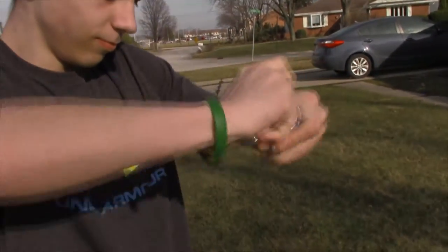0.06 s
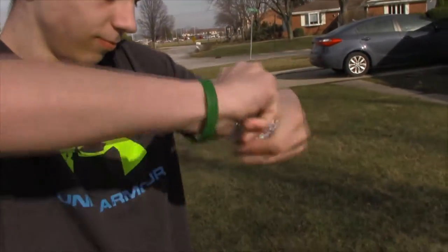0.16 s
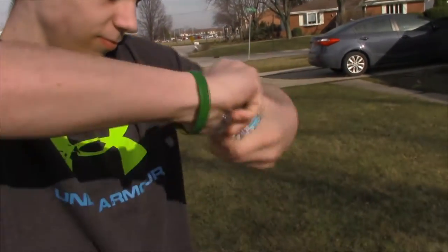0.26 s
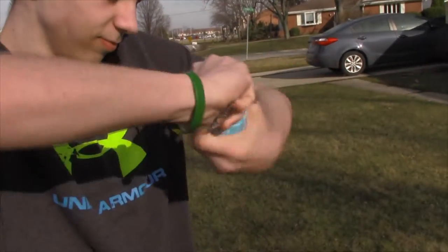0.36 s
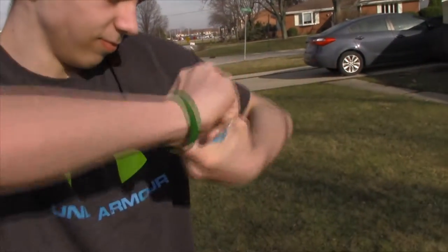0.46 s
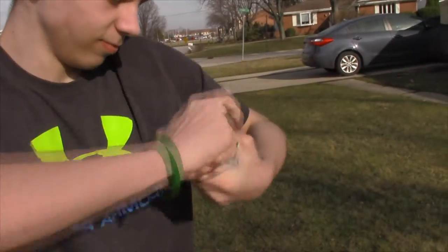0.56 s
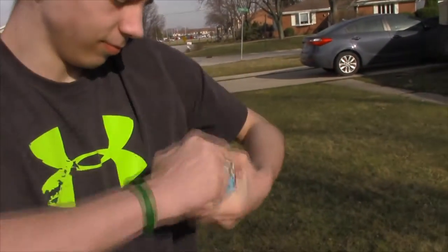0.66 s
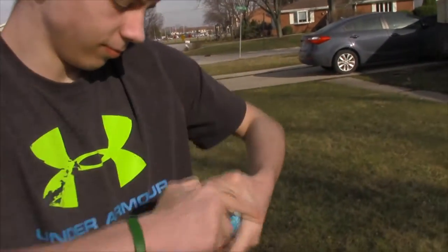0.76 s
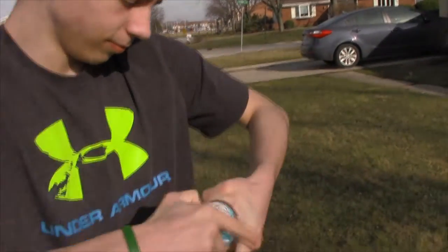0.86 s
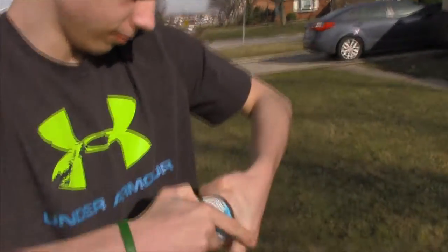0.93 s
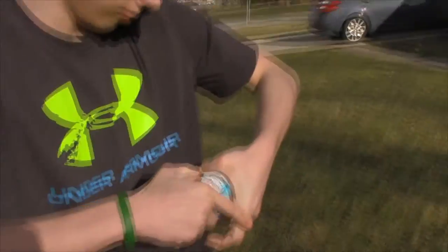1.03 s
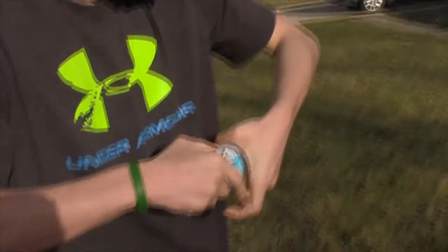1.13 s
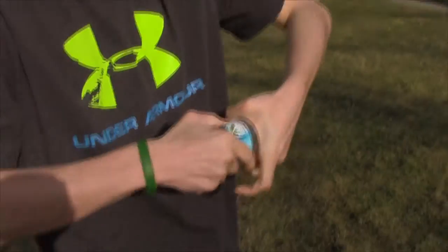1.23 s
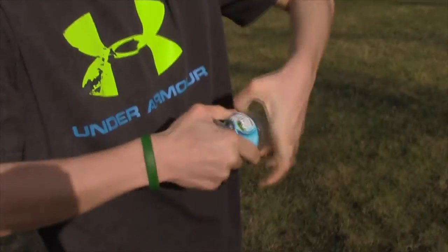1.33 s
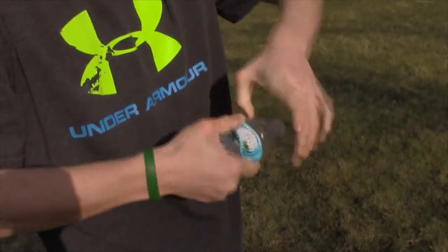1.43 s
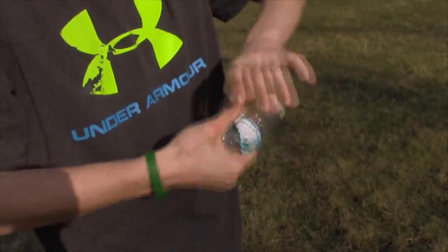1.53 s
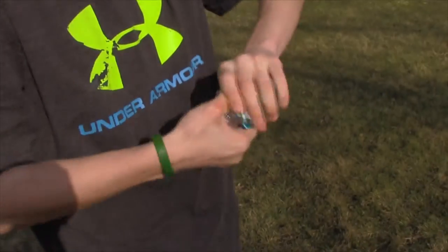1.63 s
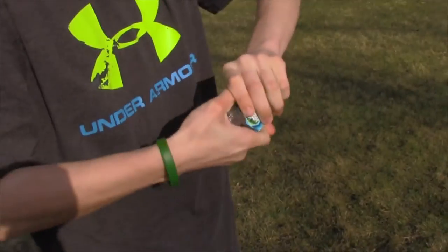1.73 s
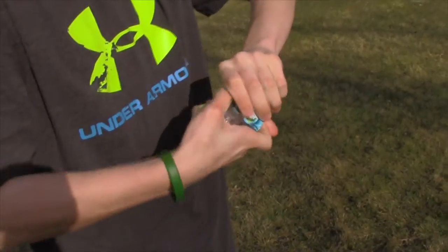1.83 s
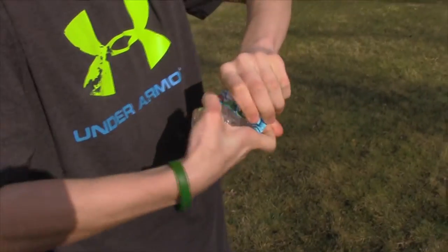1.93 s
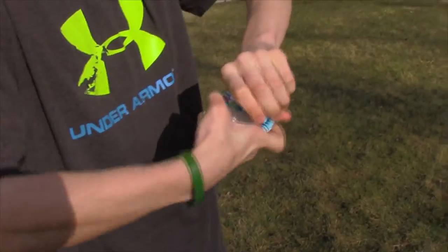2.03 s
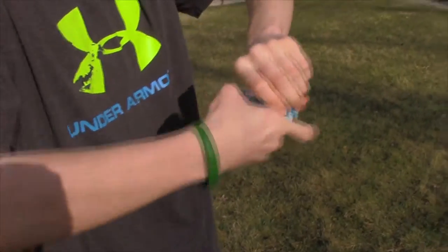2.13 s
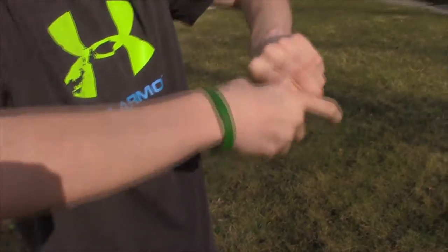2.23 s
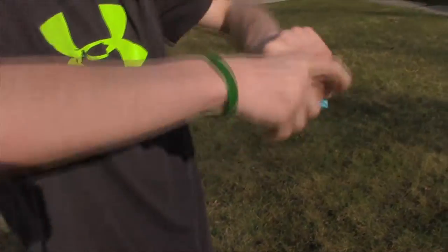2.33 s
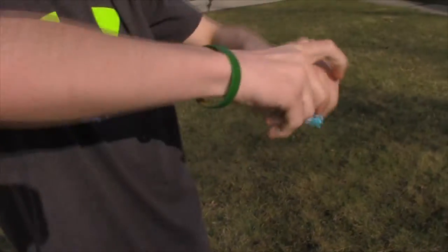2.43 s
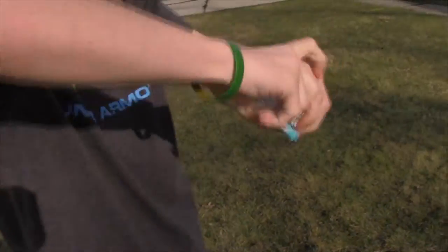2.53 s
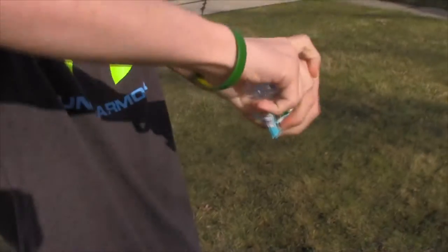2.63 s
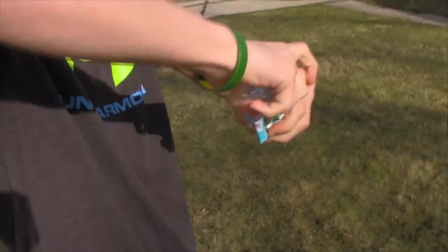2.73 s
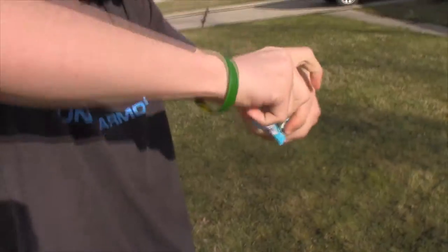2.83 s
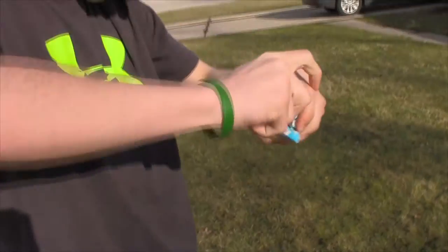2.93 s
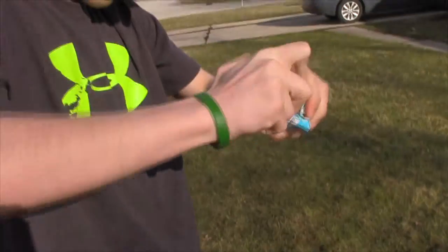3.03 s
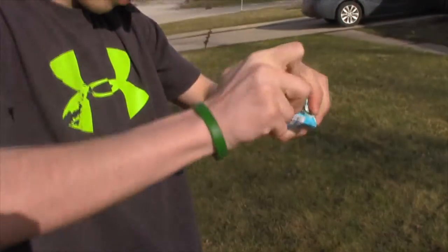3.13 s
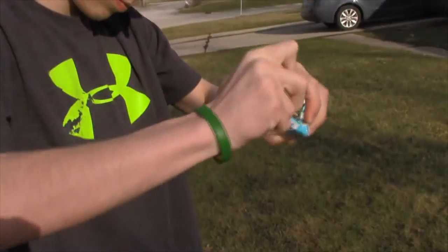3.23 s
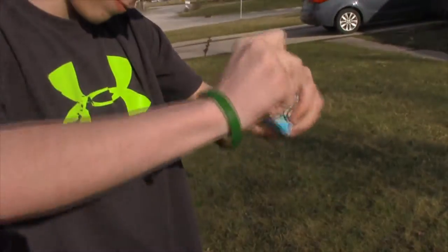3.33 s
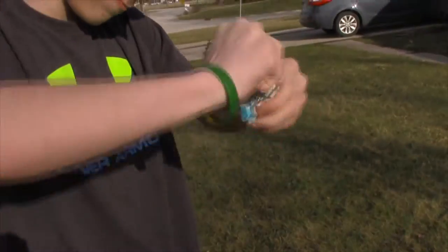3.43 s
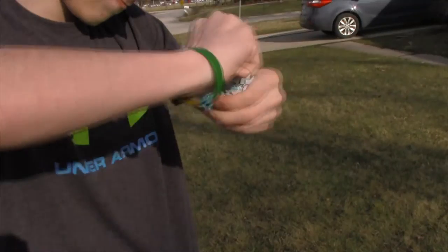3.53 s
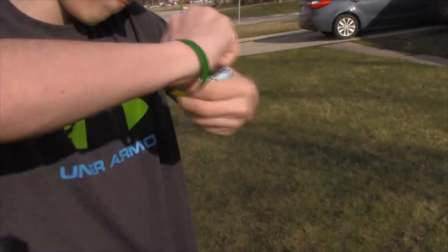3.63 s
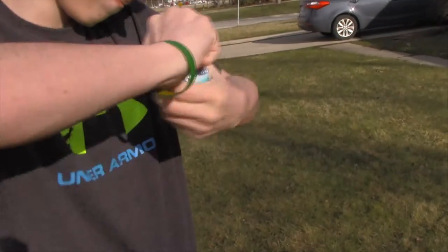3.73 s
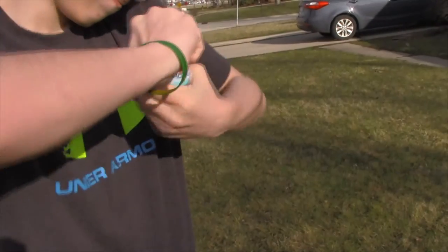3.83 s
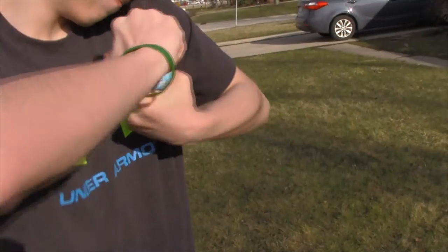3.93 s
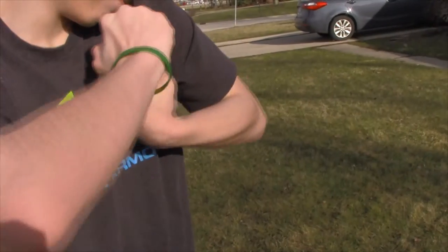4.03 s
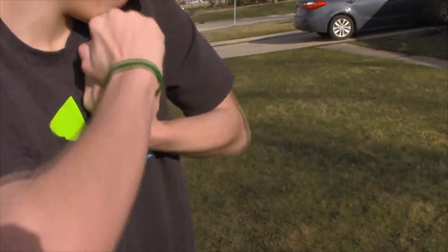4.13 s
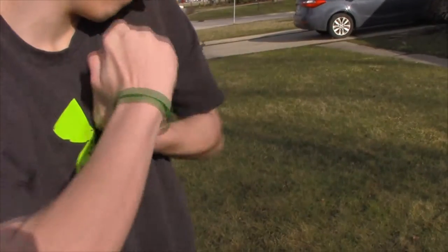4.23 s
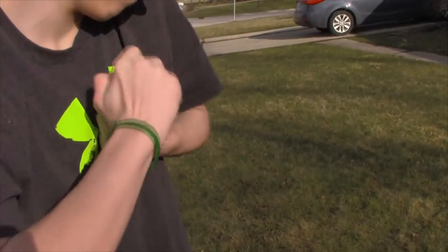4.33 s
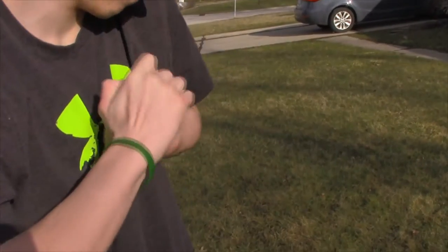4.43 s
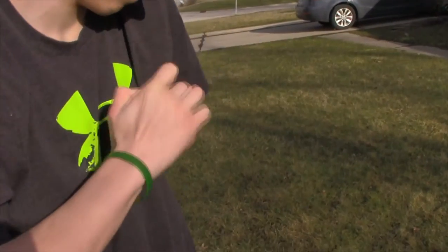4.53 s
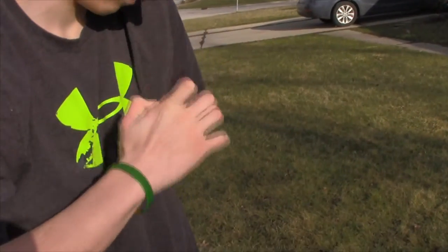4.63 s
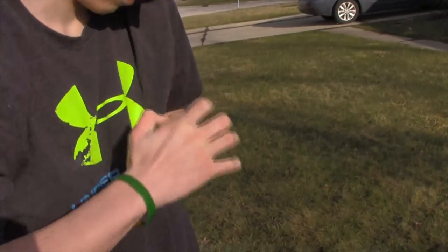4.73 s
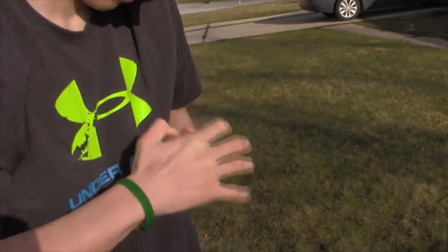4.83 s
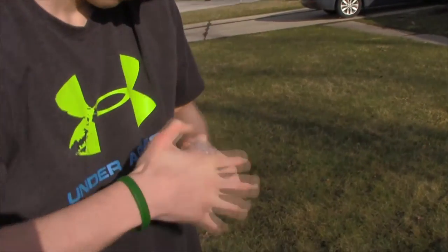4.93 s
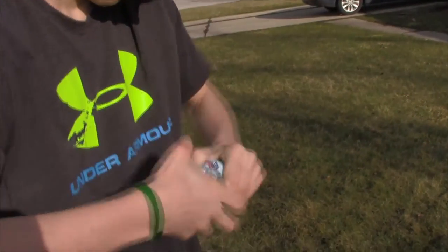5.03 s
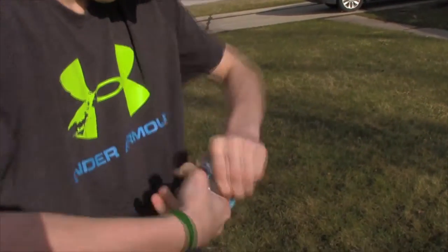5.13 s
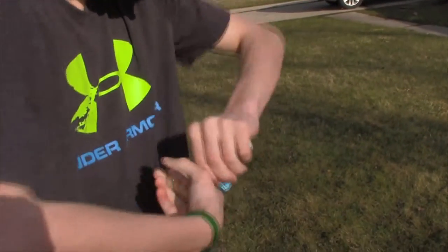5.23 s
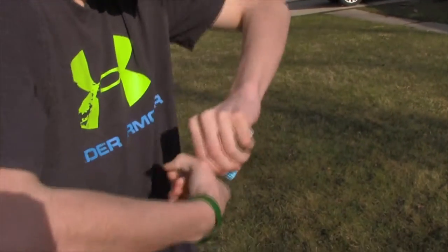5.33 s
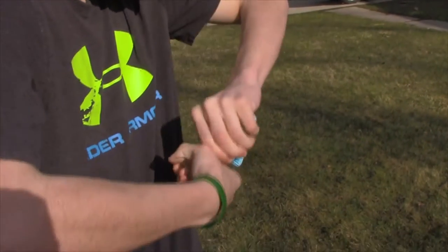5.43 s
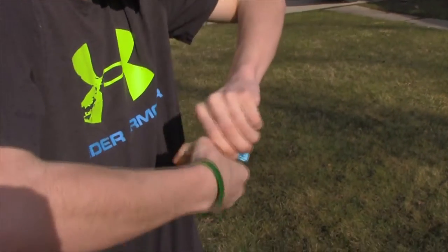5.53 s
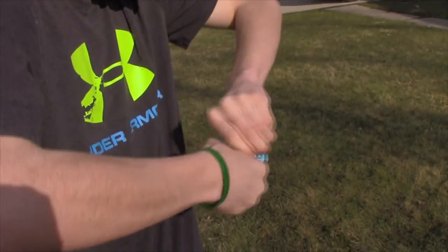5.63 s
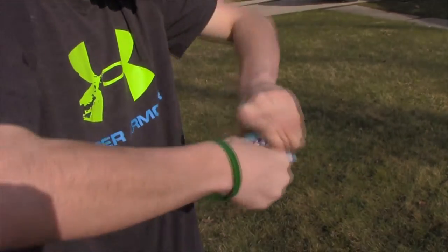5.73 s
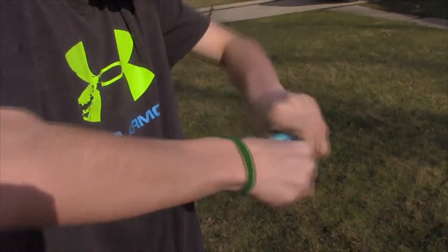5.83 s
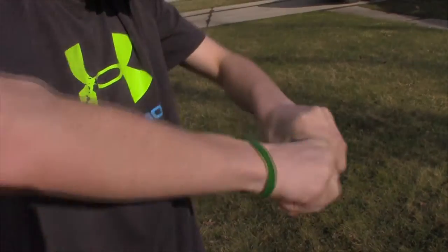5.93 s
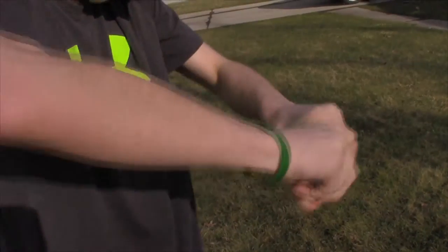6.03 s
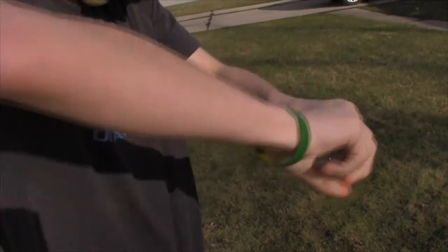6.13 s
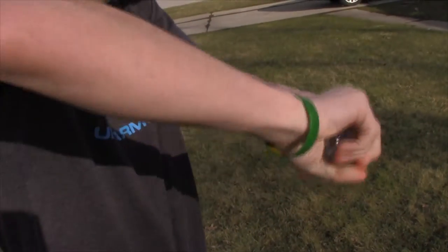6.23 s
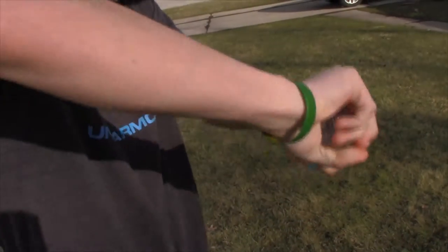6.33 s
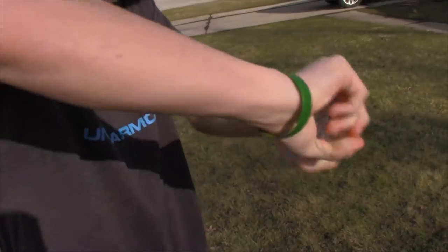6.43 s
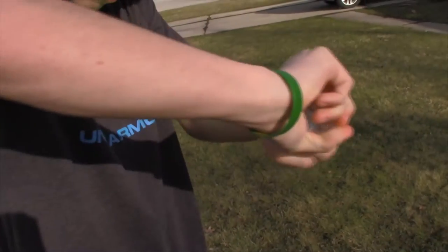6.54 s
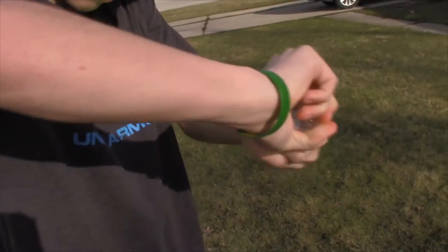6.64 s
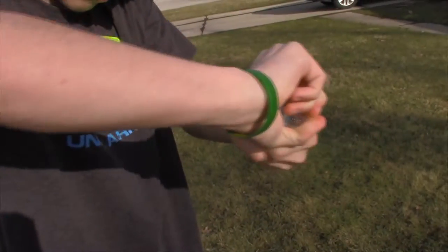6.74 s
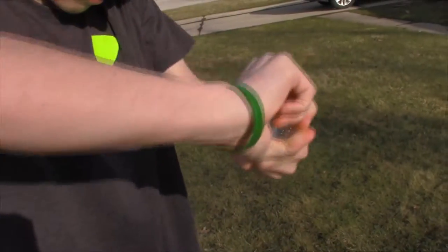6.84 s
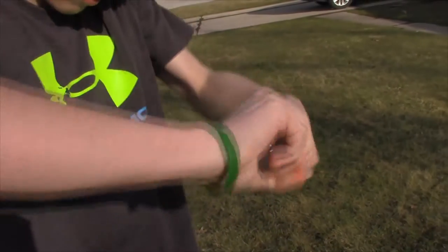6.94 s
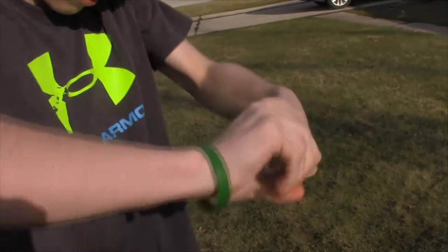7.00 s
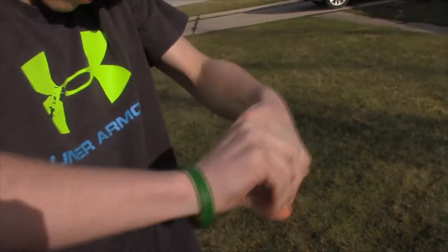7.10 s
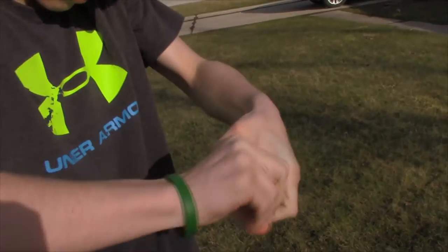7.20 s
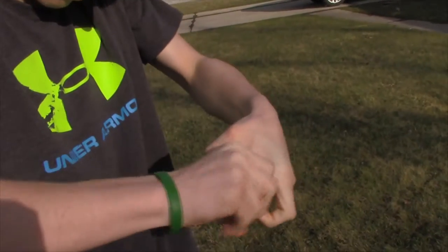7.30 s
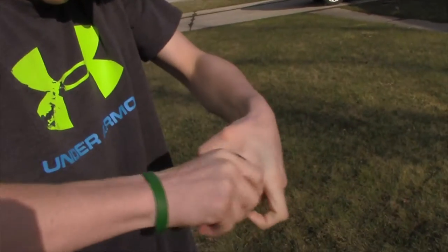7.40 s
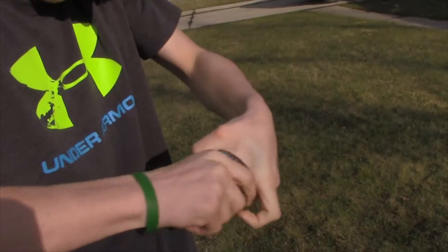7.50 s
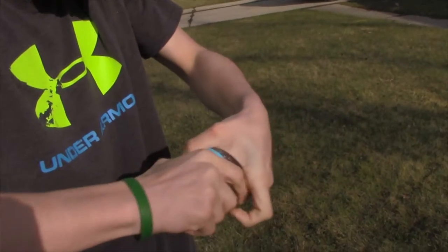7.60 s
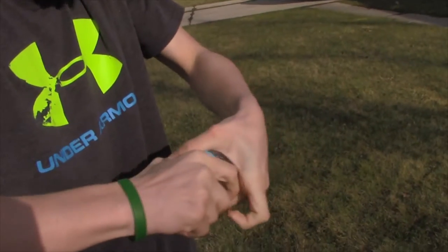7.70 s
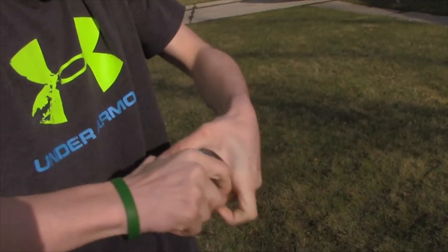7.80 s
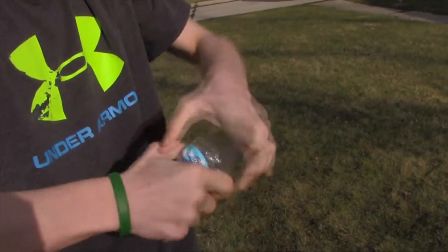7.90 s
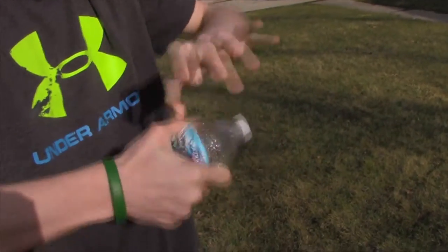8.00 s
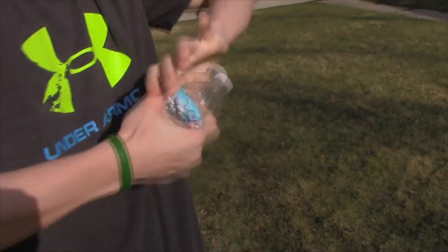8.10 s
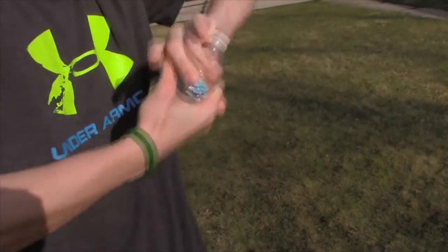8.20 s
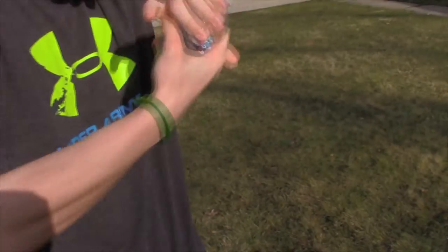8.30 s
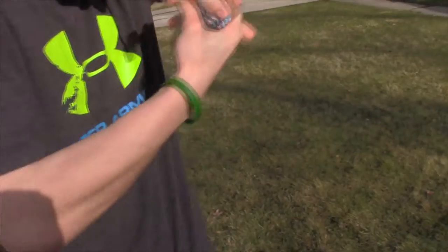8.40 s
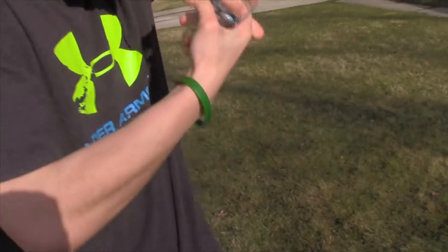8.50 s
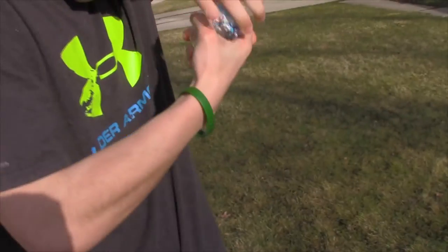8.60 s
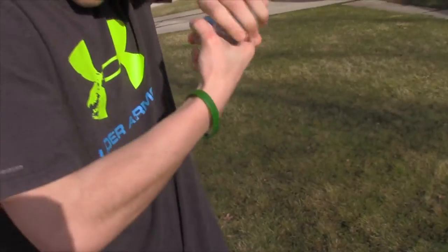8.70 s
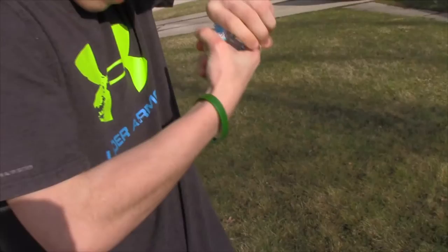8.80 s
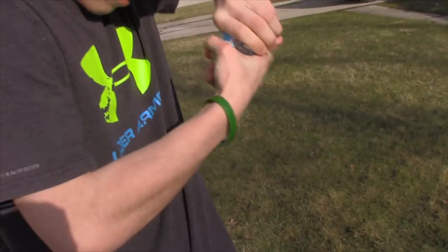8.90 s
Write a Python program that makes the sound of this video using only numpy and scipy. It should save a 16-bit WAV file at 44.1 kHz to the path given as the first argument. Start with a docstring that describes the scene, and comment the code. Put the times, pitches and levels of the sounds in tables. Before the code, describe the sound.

Hands twist a flimsy empty plastic bottle on a lawn: dry crackles, hard pops, brief finger squeaks, low far-off drone and a wind thump.

```python
"""On a lawn, with a stereo microphone close by, an empty thin plastic bottle is wrung by hand.
From the start a far-off rumble droning like traffic lies under thin open air; it swells, then fades after six seconds.
The bottle crinkles throughout: creases creep in rapid slips and stiff facets buckle with sharp snaps.
A few dull bumps reach the case; from about two seconds fingers squeak as they change grip, and a crease creaks.
Gusts of wind press on the microphone around six seconds. Noise, resonances and sines make every sound."""
import sys
import numpy as np
from scipy import signal
from scipy.fft import rfft, irfft
from scipy.io import wavfile
from scipy.ndimage import uniform_filter1d

SR = 44100
rng = np.random.default_rng(int(sys.argv[2]) if len(sys.argv) > 2 else 0)


def materialize(psi):
    """Save the field psi as 16-bit PCM at rate SR to the path in sys.argv[1].

    A 1-D psi becomes a single channel; in a 2-D psi each row is a channel.
    """
    bounded = np.clip(np.atleast_2d(psi).T, -1, 1)
    quanta = np.round(bounded * 32767).astype(np.int16)
    wavfile.write(sys.argv[1], SR, quanta)


N = 395136
TIME = np.arange(N) / SR


def from_db(db):
    """Decibels to gain."""
    return 10 ** (np.asarray(db) / 20)


def rms_one(x):
    """Scale to rms 1."""
    return x / np.sqrt(np.mean(x ** 2) + 1e-20)


def running_rms(x, span_s):
    """Smooth level of a signal over a short span."""
    width = int(span_s * SR)
    power = uniform_filter1d(uniform_filter1d(x ** 2, width), width // 2)
    return np.sqrt(np.abs(power) + 1e-12)


def in_time(rows):
    """Join the rows of a curve by straight lines."""
    s, *columns = np.transpose(rows)
    return [np.interp(TIME, s, column) for column in columns]


def at_hz(points, hz):
    """Read a spectrum on a log-frequency axis."""
    known, values = np.transpose(points)
    return np.interp(np.log(hz + 1), np.log(known), values)


def swell(s, half_s, t=TIME):
    """A bell-shaped rise and fall around a moment."""
    return np.exp(-np.minimum(((t - s) / half_s) ** 2, 20))


def drift(per_s):
    """Random wander through per_s knots a second, which have spread 1."""
    knots = rms_one(rng.standard_normal(4096))
    return np.interp(TIME * per_s, np.arange(len(knots)), knots)


def butter(x, hz, kind, order):
    """Causal Butterworth filter."""
    sections = signal.butter(order, np.minimum(hz, .49 * SR), kind, fs=SR, output="sos")
    return signal.sosfilt(sections, x + 1e-18)


def resonate(x, hz, quality):
    """Pass one resonant band, with gain 1 at its centre."""
    return signal.lfilter(*signal.iirpeak(hz, quality, fs=SR), x)


def colour(x, spectrum, size=1024):
    """Minimum-phase filter with the given spectrum: nothing sounds early."""
    cepstrum = irfft(np.log(from_db(at_hz(spectrum, np.fft.rfftfreq(size, 1 / SR)))))
    cepstrum[1:size // 2] *= 2
    cepstrum[size // 2 + 1:] = 0
    response = irfft(np.exp(rfft(cepstrum)))
    response = response.reshape((1,) * (x.ndim - 1) + (-1,))
    return signal.oaconvolve(x, response, axes=-1)[..., :x.shape[-1]]


def add(track, s, sound):
    """Mix a short sound into a track."""
    at = int(np.clip(s * SR, 0, N - 1))
    track[at:at + len(sound)] += sound[:N - at]


# How alike outdoor noise is at the two channels. Each row: frequency in Hz, left-right correlation.
CHANNEL_LIKENESS = [(60, 0.97), (200, 1), (420, 0.89), (750, 0.97), (2000, 1)]


def stereo_noise(spectrum):
    """Noise of rms 1 whose channels are only as alike as outdoor sound is at each frequency."""
    hz = np.fft.rfftfreq(N, 1 / SR)
    mid, side = rfft(rng.standard_normal((2, N))) * from_db(at_hz(spectrum, hz))
    alike = np.clip(at_hz(CHANNEL_LIKENESS, hz), 0, 1)
    channels = np.sqrt(1 + alike) * mid + np.sqrt(1 - alike) * side * [[1], [-1]]
    return rms_one(irfft(channels, N))


# Distant rumble, swelling and fading. Each row: time in seconds, level in dB.
RUMBLE_LEVEL = [(0, -68), (.8, -60.5), (1.2, -49), (2, -47.5), (3, -45), (4, -43), (4.8, -42), (5.6, -42),
                (6.2, -40), (6.6, -59.5), (7.5, -65), (8.96, -58.5)]
# Spectrum of the rumble. Each row: frequency in Hz, relative density in dB.
RUMBLE_SPECTRUM = [(25, -25), (60, -7.5), (120, 4.5), (200, 3), (300, 3), (420, -6), (720, 0.5), (1100, -7),
                   (2000, -10.5), (5000, -21), (12000, -33)]
# Faint drone in the rumble. Each row: frequency in Hz, level against the rumble in dB.
DRONE_TONES = [(127, -13), (264, -22), (297, -9)]
# Spectrum of the open air. Each row: frequency in Hz, relative density in dB.
AIR_SPECTRUM = [(30, -38), (130, -4), (450, -14), (750, 7), (1200, 0), (1800, 1.5), (2400, 7), (3200, -2.5),
                (4400, -1.5), (6500, -10), (10000, -9), (15000, -27)]
AIR_DB = -55


def outdoors(waver_db=2.5, drone_width_hz=12):
    """Steady open air under a droning rumble like far traffic: shaped noise and narrow noise bands."""
    rumble_db, = in_time(RUMBLE_LEVEL)
    drone = 0
    for hz, level_db in DRONE_TONES:
        tone = resonate(rng.standard_normal(N), hz, hz / drone_width_hz)
        drone = drone + from_db(level_db) * rms_one(tone)
    wavering = from_db(rumble_db + waver_db * drift(8))
    rumble = wavering * (stereo_noise(RUMBLE_SPECTRUM) + drone)
    return rumble + from_db(AIR_DB) * stereo_noise(AIR_SPECTRUM)


# Twists of the hands. Each row: start in seconds, length in seconds, level halfway through in dB,
# growth from start to end in dB, brightness as treble minus body in dB, slips per second halfway through.
HAND_TWISTS = [(0, 0.068, -41, 0, 11, 196), (0.097, 0.27, -34.5, 3, 11.5, 276),
               (.406, .045, -32, -2, 15.5, 495), (0.553, 0.054, -40, 2, 10, 170),
               (0.631, 0.19, -33.5, 2, 7.5, 392), (0.861, 0.21, -44.5, 0, 0, 222),
               (1.14, 0.03, -45, 0, -15, 118), (1.201, 0.11, -39.5, 1, 28, 101),
               (1.648, 0.076, -44, 0, -2, 85), (1.779, 0.096, -42, 3.5, -5, 700),
               (1.9, .03, -31, 0, 0.5, 400), (1.959, .13, -37.5, 0.5, -1.5, 110),
               (2.109, .15, -25.5, 7, 11.5, 490), (2.267, 0.059, -33, -1.5, 7, 102),
               (2.351, 0.11, -27.5, -1, 3, 730), (2.5, 0.1, -28.5, 0, 0, 520),
               (2.639, 0.19, -32, 3, 2, 167), (2.841, 0.061, -27, 1.5, 3.5, 516),
               (2.954, 0.12, -25.5, 3, 9.5, 500), (3.095, 0.095, -37, -3, 10, 170),
               (3.276, 0.048, -38, 6, 10, 210), (3.346, .1, -30.5, 0, 9, 437),
               (3.47, 0.21, -27, 0, 7.5, 720), (3.693, 0.089, -37, -10, 12, 190),
               (3.828, 0.14, -29.5, 5, 13, 300), (4.041, 0.075, -33, -2, 9, 372),
               (4.148, 0.062, -44, 0.5, 30, 95), (4.242, .31, -29.5, -3, 7, 336),
               (4.582, .11, -35.5, -10, 8, 217), (5.198, .16, -45.5, -1, 9, 79),
               (5.384, 0.091, -33.5, 1, 4, 192), (5.498, 0.22, -33, 1, -2, 200),
               (5.761, .17, -29, 4, 6, 460), (5.96, 0.23, -31.5, 0, 2.5, 215),
               (6.237, 0.13, -29, -2, 5.5, 257), (6.389, 0.032, -34, 0, 30, 87),
               (6.441, 0.15, -32.5, -6.5, 8.5, 236), (6.619, 0.19, -33.5, 0, 2.5, 124),
               (6.841, 0.088, -46.5, 0, 19, 55), (6.967, .055, -28.5, -8, 13, 490),
               (7.082, 0.2, -35, -6, 1, 153), (7.37, 0.06, -30.5, -1, 13, 404),
               (7.554, 0.073, -38, -0.5, 2.5, 178), (7.717, .15, -42, 0, 6, 168),
               (7.91, 0.027, -25.5, 0, 11, 460), (8.278, 0.044, -26.5, -6, 11, 430),
               (8.599, 0.02, -42, 1.5, 1.5, 530), (8.848, 0.096, -43, -6.5, 2, 72)]
ATTACK_S, RELEASE_S = .04, .055   # time for a twist to rise or fall by 20 dB
SLIPS_FOLLOW = .6   # share of a twist's swing in level that the slip rate follows
TREMOR_DB, TREMOR_PER_S = 1.42, 29   # the hands pull unevenly
HELD_DB, HELD_BRIGHT_DB, HELD_SLIPS_PER_S = -61, 14, 45   # the wall keeps ticking while it is only held


def wringing():
    """Level, brightness and slip rate: each twist sets in, grows or eases, lets go; it slips faster when louder."""
    t = TIME[::64]   # coarse steps suffice for the hands
    s, length, level_db, growth_db, bright_db, per_s = np.transpose(HAND_TWISTS)[:, :, None]
    outside = np.maximum(s - t, 0) / ATTACK_S + np.maximum(t - s - length, 0) / RELEASE_S
    growth = growth_db * (np.clip((t - s) / length, 0, 1) - .5)
    effort_db = growth - 20 * np.minimum(outside, 10)
    twists = from_db(level_db + effort_db) ** 2
    held = from_db(HELD_DB) ** 2
    power = twists.sum(axis=0) + held

    def blend(twisting, resting):
        """Average weighted by the power of each twist."""
        return ((twists * twisting).sum(axis=0) + held * resting) / power

    rate = blend(per_s * from_db(SLIPS_FOLLOW * effort_db), HELD_SLIPS_PER_S)
    bright = blend(bright_db, HELD_BRIGHT_DB)
    level, bright, rate = in_time(np.transpose([t, 10 * np.log10(power), bright, rate]))
    return level + TREMOR_DB * drift(TREMOR_PER_S), bright, rate


def unit_energy(rows):
    """Scale each row to energy 1."""
    return rows / np.linalg.norm(rows, axis=1, keepdims=True)


def facets(count, crack_db, ring_t60, tint_db, size=1536):
    """Facet responses: a crack, a dense hand-damped ring and a faint tail; each facet favours one broad band."""
    t = np.arange(size) / SR
    draws = rng.standard_normal((count, 2, size))
    favoured_hz = np.exp(rng.uniform(np.log(1500), np.log(11000), count))
    ring = unit_energy(draws[:, 0] * from_db(-60 * t / ring_t60))
    tail = unit_energy(draws[:, 1] * from_db(-60 * t / .04))
    out = ring + from_db(-14) * tail
    out[:, 0] += from_db(crack_db) * np.sign(out[:, 0])   # the crack is the first sample
    tint = np.array([resonate(row, hz, 5) for hz, row in zip(favoured_hz, out)])
    return unit_energy(out + from_db(tint_db) * tint)


SPLIT_HZ = 3800   # between body and treble


def voiced(x, bright_db, size_of):
    """Small tight folds favour the treble, broad ones the body; the total power stays about 1."""
    body = butter(x, SPLIT_HZ, "low", order=3)
    treble = butter(x, SPLIT_HZ, "high", order=3)
    ratio = from_db(bright_db)
    return (body / size_of(body) + ratio * treble / size_of(treble)) / np.sqrt(1 + ratio ** 2)


# Stretched panels that ring while worked. Each row: middle in seconds, half length in seconds,
# frequency in Hz, lift in dB.
RINGING_PANELS = [(0.106, 0.013, 6000, 11), (0.757, 0.1, 2670, 7), (1.053, 0.081, 830, 28),
                  (1.735, 0.025, 4450, 12), (1.976, 0.051, 880, 27), (2.257, 0.11, 4560, 10),
                  (2.391, 0.038, 3300, 8), (2.549, 0.083, 1039, 5.5), (2.851, 0.068, 996.7, 5),
                  (2.985, 0.057, 4804, 7), (3.5, .1, 3395, 3), (3.982, 0.1, 11690, 13.5),
                  (4.299, 0.059, 11480, 10), (4.65, 0.091, 580.4, 19), (5.65, 0.066, 1928, 13),
                  (6.249, 0.085, 2104, 9), (6.747, 0.094, 2200, 6), (8.3, 0.058, 3693, 4),
                  (8.342, 0.036, 630, 16)]


def panels(x, t=TIME, quality=14.0, hand_width_hz=250):
    """A panel under tension lifts a band while it is worked; the hand's damping widens it."""
    out = x.copy()
    for s, half_s, hz, lift_db in RINGING_PANELS:
        width_hz = hz / quality + hand_width_hz
        worked = x * swell(s, half_s, t) + 1e-18
        out += (from_db(lift_db) - 1) * resonate(worked, hz, hz / width_hz)
    return out


def rubbed(hiss, bank, facets_per_s):
    """Friction hiss rings in one facet after another as the contact travels, so its resonances keep shifting."""
    out, hop = np.zeros(N), int(SR / facets_per_s)
    for k, at in enumerate(range(0, N, hop)):
        contact = hiss[at:at + 2 * hop]
        fade = np.sin(np.pi * np.arange(len(contact)) / (2 * hop))
        add(out, at / SR, signal.fftconvolve(contact * fade, bank[(k + 1) % len(bank)]))
    return out


# Spectrum of the bottle wall, shared by creep, snaps and creak. Each row: frequency in Hz, relative level in dB.
WALL_SPECTRUM = [(200, -22), (600, -9.5), (1250, -6.5), (1800, -0.5), (2400, 1), (3400, 0.5), (4500, -3.5),
                 (7000, -1), (10000, -2.5), (12000, -8), (14000, -16), (16000, -21)]


def crinkle(level_db, bright_db, per_s, even_s=0.039, count=240):
    """Stick and slip: each slip kicks one of a few neighbouring facets; fast creep merges into a rubbing hiss."""
    per_s = np.maximum(per_s, 10)
    distinct_per_s = 240 * np.tanh(per_s / 240)   # faster slips are no longer heard singly
    jitter, spread_db, facets_per_s, follow_s = .3, 3.8, 22, .0016
    draws = rng.standard_normal((3000, 5))
    creep = np.cumsum(distinct_per_s) / SR   # slips so far
    times = np.interp(np.arange(len(draws)) + jitter * draws[:, 0], creep, TIME)
    bank = facets(count=count, crack_db=-1.5, ring_t60=.0095, tint_db=2.0)
    slips = np.zeros(N)
    for s, (_, strength, place, lag, weaker) in zip(times[:int(creep[-1])], np.clip(draws, -2, 2)):
        facet = int(s * facets_per_s + 2 * place)
        gain = from_db(spread_db * strength)
        add(slips, s, gain * bank[facet % count])
        # the next facet along the crease gives way just before or after
        next_gain = gain * from_db(-8 + spread_db * weaker)
        add(slips, s + follow_s * lag, next_gain * bank[(facet + 1) % count])
    rub_db, rub_per_s, grain_db = -7.5, 250, 2.0   # rub_db holds at rub_per_s slips per second
    rub_gain = from_db(rub_db + grain_db * drift(400)) * per_s / rub_per_s
    rub = rubbed(rub_gain * rng.standard_normal(N), bank, facets_per_s)
    even_slips = slips / np.sqrt(distinct_per_s / SR)   # same power at any slip rate
    wall = panels(colour(even_slips + rub, WALL_SPECTRUM))
    return from_db(level_db) * voiced(wall, bright_db, lambda v: running_rms(v, even_s))


# Facets that buckle with a distinct snap. Each row: time in seconds, energy in dB,
# brightness as treble minus body in dB.
FACET_SNAPS = [(.0663, -10, 4), (.095, -6, 18), (.1032, 2, 19), (.1117, -5, 16), (.1213, -6, 15),
               (.1468, -7, 13), (.1766, -1.5, 18), (.2225, 0, 13), (.2794, -5, 11), (.2886, 0.5, 29),
               (.337, -3, 10), (.364, 1.5, 13), (.3808, -11, 18), (.4102, -1.5, 16), (.4512, -7, 19),
               (.5044, -15, 26), (.5484, -14, 15), (.6154, -1, 9), (.6372, 1, 9), (.6753, -1.5, -1),
               (.7701, -7, 15), (.9866, -20, 10), (1.0381, -15, -17), (1.1401, -14.5, -15),
               (1.1819, -5, -3), (1.2335, -24, 17), (1.3332, 0, 11), (1.3953, -10, 17.5), (1.4512, -17, 22),
               (1.648, -5, 5), (1.6847, -11.5, -17), (1.7418, 5, -3.5), (1.7603, -2, -2), (1.7816, -2, 22),
               (1.9252, -2, -1), (2.0205, -5.5, 2), (2.1826, 10.5, -9.5), (2.3918, 1, -8),
               (2.5194, -1.5, -20), (2.7417, -3, -1), (2.8854, 6.5, 12), (3.0398, 6.5, 6), (3.1419, -9, 18),
               (3.4712, -0.5, 4), (3.5255, 4, 0.5), (3.5491, 4.5, 1), (3.6315, 3, 12), (3.6575, 1, 9),
               (3.6755, 4.5, 21), (3.7008, -2.5, 12), (3.7455, 0, 13), (3.9018, 2.5, 22), (3.9352, -3, 10),
               (4.0192, 1, 7.5), (4.0375, -6, 6), (4.1052, -0.5, 5.5), (4.4692, -0.5, -9),
               (4.5206, 4.5, 7.5), (4.5763, 12, 20), (4.7364, 0, 7), (4.7865, -3.5, 6.5), (4.8253, -4.5, 8),
               (5.05, -11, 2), (5.083, 11, 8), (5.167, -1.5, 21), (5.1975, -10, 0), (5.241, -12, -6),
               (5.279, -3, 14), (5.2931, 14, 10.5), (5.415, 0, 18), (5.5995, -2, -18), (5.6318, 0, -9),
               (5.6694, -11, -7), (5.6855, -4, 15), (6.1511, 13, 7.5), (6.2117, -4, -4), (6.2479, 2.5, -11),
               (6.2864, 1.5, -17), (6.3039, -3, 18), (6.3586, 1.5, 1), (6.4243, -1.5, -12),
               (6.5374, -9, -11), (6.5529, -5.5, -7), (6.6612, -4, 3), (6.7147, -2.5, 2), (6.757, -3, -1),
               (6.7785, -10, 2), (6.8059, -9, 14), (6.815, -5, -12), (6.9165, -6.5, 30), (6.9399, -1.5, 13),
               (7.1124, 2, -9), (7.1396, -3.5, 6), (7.1714, -2.5, 13), (7.1892, -4, 13), (7.23, -3.5, 8),
               (7.2835, -4, 9), (7.3106, -5, 13), (7.3475, -5, 10), (7.4507, -3, 12), (7.4805, -5.5, 16),
               (7.5245, -6.5, 15), (7.5382, -3.5, 9.5), (7.623, -7, 12), (7.7278, -7, 20),
               (7.7688, -1.5, 27), (7.7759, 0, 16), (7.828, -3, 10), (7.8807, -6, 13), (7.8964, 2, 23),
               (8.0796, -14, 9), (8.189, -10.5, 16), (8.243, -1, 17), (8.2884, 6.5, 14), (8.4355, -12, -13),
               (8.604, -3, 32), (8.7021, -13.5, -7), (8.739, -12, -14), (8.8397, 2.5, 0)]


def snaps(rows, lowest_hz=1150, bass_loss=0.32, shorten=0.048, sharpen=0.069):
    """A facet flips through at once; the brighter, the harder its crack, shorter its ring and thinner its bass."""
    s, energy_db, bright_db = np.transpose(rows)
    ring_t60 = .0115 * from_db(-shorten * bright_db[:, None])
    rings = facets(count=len(s), crack_db=-2.0 + sharpen * bright_db, ring_t60=ring_t60, tint_db=-3.0)
    rings = colour(rings, WALL_SPECTRUM)
    bass_edges_hz = lowest_hz * from_db(bass_loss * bright_db)
    rings = np.array([butter(ring, hz, "high", order=2) for ring, hz in zip(rings, bass_edges_hz)])
    rings = panels(rings, s[:, None])
    rings = voiced(rings, bright_db[:, None], lambda v: np.linalg.norm(v, axis=1, keepdims=True))
    out = np.zeros(N)
    for at, level_db, ring in zip(s, energy_db, rings):
        add(out, at, from_db(level_db) * ring)
    return out


CRACKLES_LIMIT_PER_S, FULL_EFFORT_DB = 2.7, -34.5   # the rate nears its limit above full effort
CRACKLE_OVER_DB, CRACKLE_SPREAD_DB = 19, 2   # energy above the creep's level, and its spread


def crackles(level_db, bright_db, count=300):
    """Lesser buckles come at random, oftener and harder with effort: rows (s, energy dB, brightness dB)."""
    draws = rng.standard_normal((count, 3))
    due = np.cumsum(CRACKLES_LIMIT_PER_S * np.tanh(from_db(level_db - FULL_EFFORT_DB))) / SR
    at = np.searchsorted(due, np.abs(np.arange(count) + .5 + .5 * draws[:, 0]))
    heard = at < N
    at = at[heard]
    strength, tint = np.clip(draws[heard, 1:], -2, 2).T
    energy_db = level_db[at] + CRACKLE_OVER_DB + CRACKLE_SPREAD_DB * strength
    return np.transpose([at / SR, energy_db, bright_db[at] + 6 * tint])


# Dull bumps on the microphone's case. Each row: middle in seconds, half length in seconds, peak level in dB.
CASE_BUMPS = [(0.117, 0.11, -58.5), (4.199, 0.03, -41), (4.749, 0.0077, -38), (7.056, .014, -34),
              (7.157, 0.017, -28.5), (7.219, 0.0077, -26), (7.26, 0.021, -39), (7.333, 0.0098, -41),
              (7.771, 0.026, -44.5), (7.835, 0.018, -44), (8.103, 0.016, -53), (8.631, 0.029, -55),
              (8.907, 0.031, -41)]
# Spectrum of the bumps. Each row: frequency in Hz, relative level in dB.
BUMP_SPECTRUM = [(40, -54), (110, -12.5), (190, -2.5), (290, -5.5), (420, -12.5), (620, -28), (1200, -40)]


def handling():
    """Bumps travel through the case and reach both channels alike: swells of dull noise."""
    shudder = colour(rng.standard_normal(N), BUMP_SPECTRUM, size=4096)
    shudder = shudder / running_rms(shudder, .02)
    return shudder * sum(from_db(level_db) * swell(s, half_s) for s, half_s, level_db in CASE_BUMPS)


# Fingers slipping on the wall. Each row: start in seconds, length in seconds, start frequency in Hz,
# end frequency in Hz, peak level of the fundamental in dB.
FINGER_SQUEAKS = [(1.774, 0.088, 2995, 3380, -40), (1.828, 0.1, 2510, 2766, -37),
                  (1.835, 0.056, 4280, 4500, -38), (3.53, 0.035, 5594, 6210, -22),
                  (3.555, 0.025, 3750, 2833, -29), (4.537, 0.039, 790, 701.5, -39.5),
                  (4.59, .025, 2468, 2592, -40), (4.894, 0.047, 1405, 1414, -39.5),
                  (4.912, 0.026, 780, 910, -38), (4.925, 0.039, 1000, 1544, -38.5),
                  (4.939, 0.042, 620, 787, -40)]


def squeaks(octave_db=-14.0, waver=0.02):
    """Skin slides on the plastic in short gliding tones, each a wavering sine and its octave."""
    out, wobble = np.zeros(N), 1 + waver * drift(420)
    for s, length, start_hz, end_hz, level_db in FINGER_SQUEAKS:
        part = np.clip((TIME - s) / length, 0, 1)
        hz = (start_hz + (end_hz - start_hz) * part) * wobble
        phase = 2 * np.pi * np.cumsum(hz) / SR
        tone = np.sin(phase) + from_db(octave_db) * np.sin(2 * phase)
        out += from_db(level_db) * np.sin(np.pi * part) * tone
    return out


# A taut crease slipping so regularly that it creaks. The one row: start in seconds, length in seconds,
# slips per second at the start, slips per second at the end, level in dB, brightness as treble minus body in dB.
CREASE_CREAK = (1.785, .125, 240, 250, -40, -4)


def creak():
    """Almost evenly spaced slips kick one and the same facet: a rough stack of gliding partials."""
    s, length, start_per_s, end_per_s, level_db, bright_db = CREASE_CREAK
    jitter, uneven_db = .012, 2.5
    part = np.clip((TIME - s) / length, 0, 1)
    per_s = (start_per_s + (end_per_s - start_per_s) * part) * (1 + jitter * drift(200))
    ticks = np.diff(np.floor(np.cumsum(per_s) / SR), prepend=0)
    slips = ticks * from_db(uneven_db * drift(300)) * np.sqrt(part * (1 - part))
    facet, = facets(count=1, crack_db=0.0, ring_t60=.008, tint_db=0.0)
    ring = colour(signal.oaconvolve(slips, facet)[:N], WALL_SPECTRUM)
    return from_db(level_db) * voiced(ring, bright_db, lambda v: np.linalg.norm(v) / np.sqrt(length * SR))


# Wind on the microphone. Each row: middle in seconds, half length in seconds, peak level in dB, centre in Hz.
WIND_GUSTS = [(4.85, 0.042, -40, 90), (5.902, 0.03, -30, 150), (5.984, 0.061, -20, 170),
              (6.096, 0.055, -30.5, 136.2), (6.252, 0.065, -41, 113.9)]


def wind(width=1.576):
    """Lumpy low turbulence, different on the two ports: swells of band-passed noise."""
    eddies = rng.standard_normal((2, N)) * from_db(3 * drift(60))
    out = 0
    for s, half_s, level_db, hz in WIND_GUSTS:
        gust = butter(eddies, [hz / width, hz * width], "band", order=2)
        out = out + from_db(level_db) * swell(s, half_s) * gust / running_rms(gust, .06)
    return out


def ports(x, low_hz=5500, high_hz=13000, differ_db=-23):
    """The two close microphone ports differ a little in the treble."""
    treble_slope = np.gradient(butter(x, [low_hz, high_hz], "band", order=2))
    return x + from_db(differ_db) * treble_slope * [[1], [-1]]


def reflections(x, ground_s=.0068, ground_db=-13.5, dull_hz=6000):
    """A soft, dull bounce off the lawn."""
    late = np.interp(TIME - ground_s, TIME, x, left=0)
    return butter(from_db(ground_db) * late, dull_hz, "low", order=1)


def scene():
    """The bottle straight ahead, the open air all round."""
    level_db, bright_db, per_s = wringing()
    bottle = crinkle(level_db, bright_db, per_s)
    bottle = bottle + snaps(FACET_SNAPS) + snaps(crackles(level_db, bright_db))
    bottle = bottle + squeaks() + creak()
    around = outdoors() + handling() + wind()
    return ports(bottle) + reflections(bottle) + around


CUTOFF_HZ = 15850


def record(dry):
    """Peaks overload at 0.8 of full scale; a steep low-pass cuts the top."""
    top_cut = signal.ellip(10, .1, 100, CUTOFF_HZ, fs=SR, output="sos")
    return signal.sosfilt(top_cut, np.clip(dry, -.8, .8))


dry = scene()
out = record(dry)
materialize(out)
```